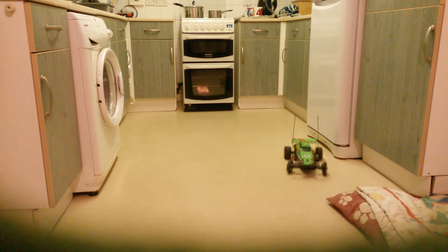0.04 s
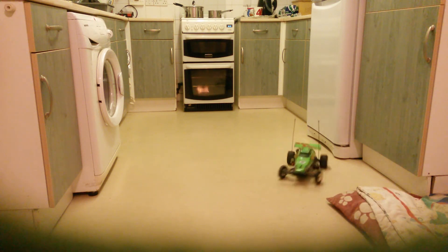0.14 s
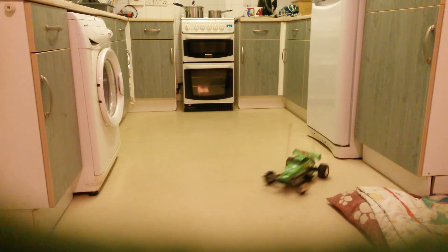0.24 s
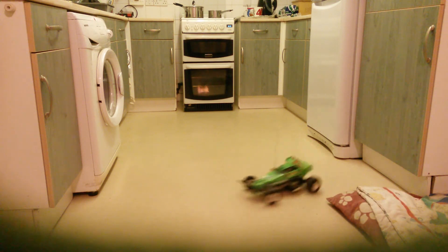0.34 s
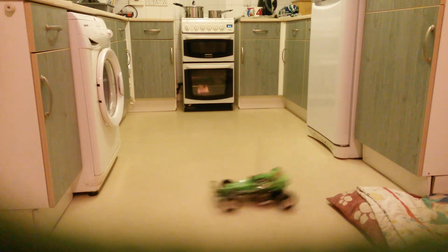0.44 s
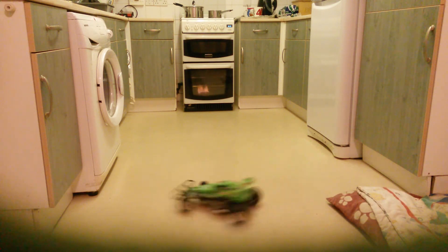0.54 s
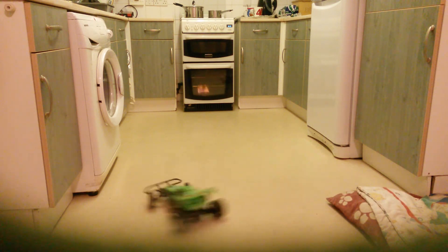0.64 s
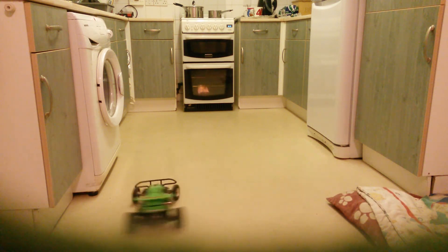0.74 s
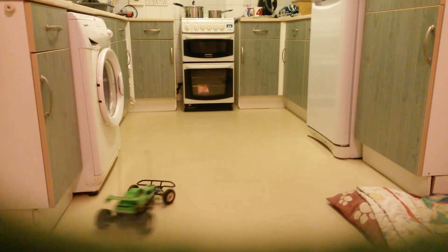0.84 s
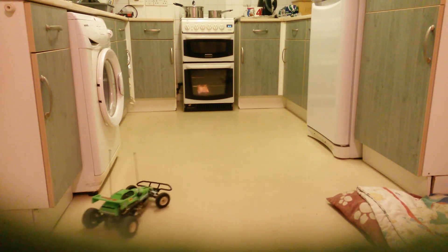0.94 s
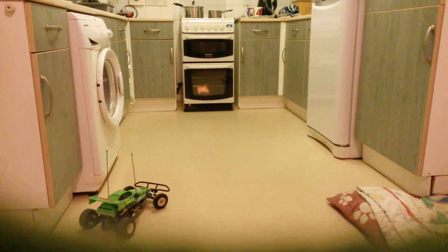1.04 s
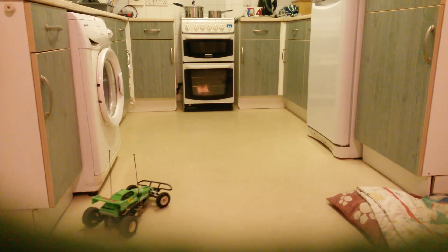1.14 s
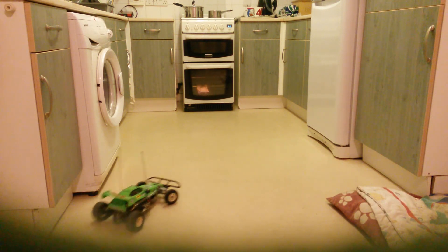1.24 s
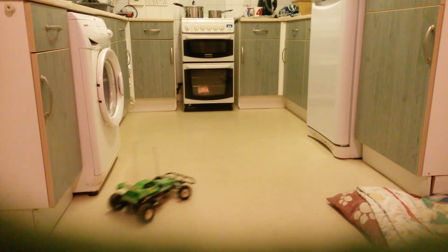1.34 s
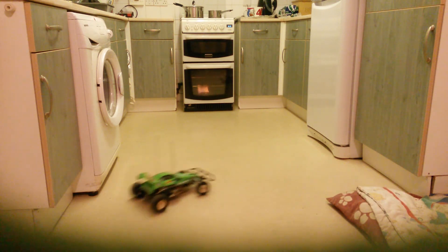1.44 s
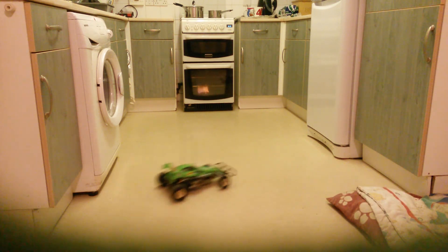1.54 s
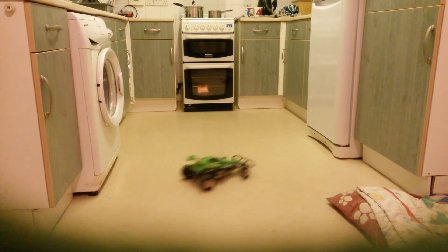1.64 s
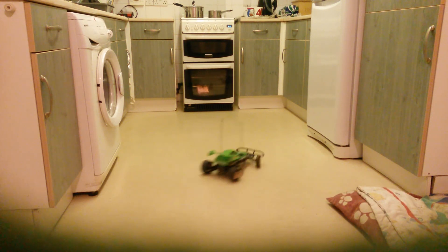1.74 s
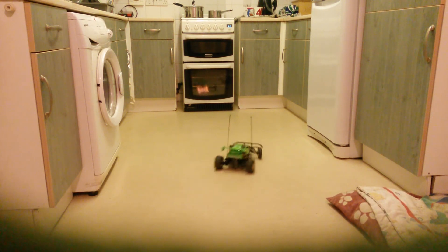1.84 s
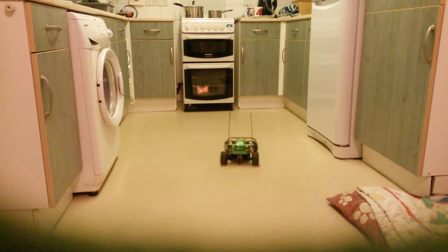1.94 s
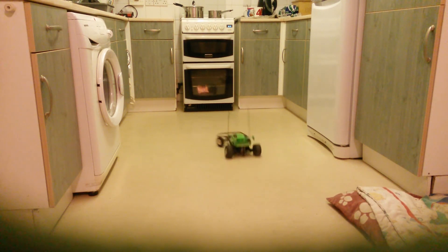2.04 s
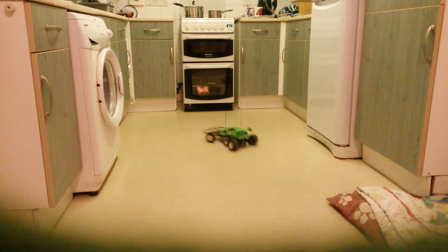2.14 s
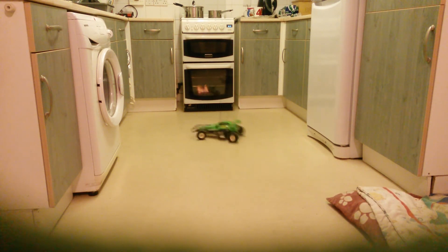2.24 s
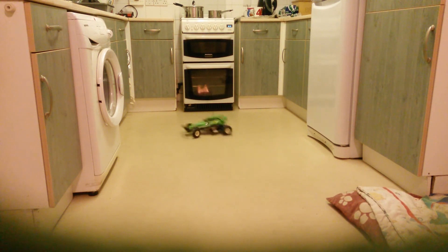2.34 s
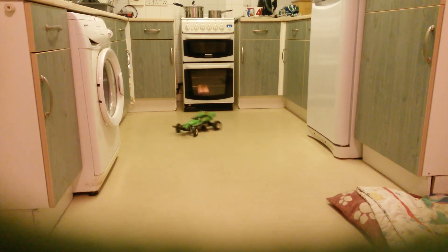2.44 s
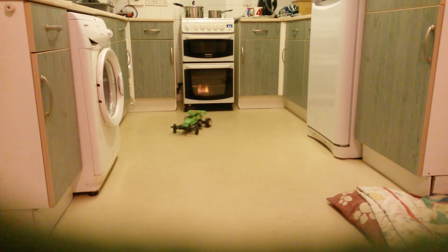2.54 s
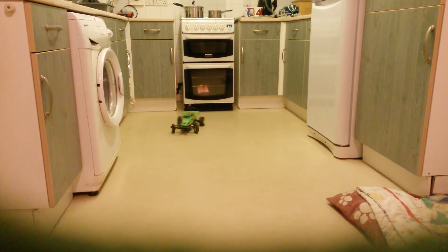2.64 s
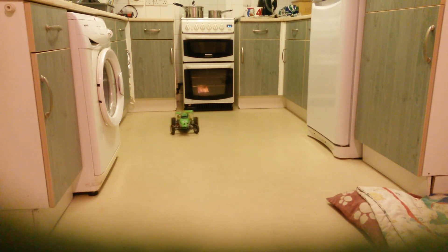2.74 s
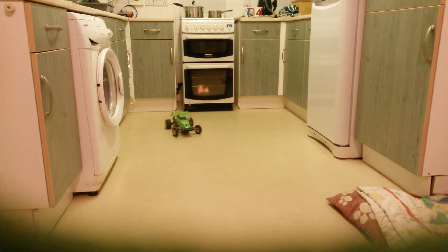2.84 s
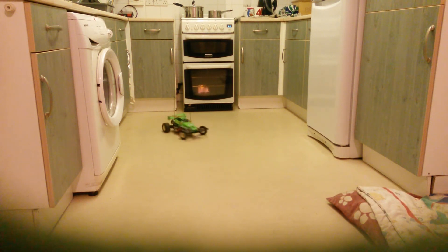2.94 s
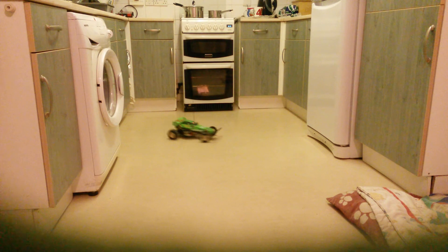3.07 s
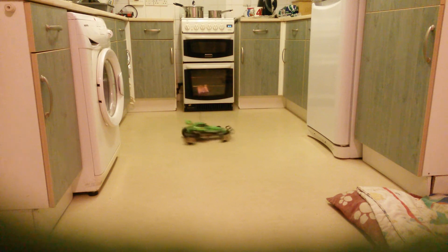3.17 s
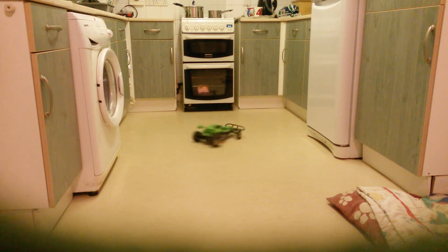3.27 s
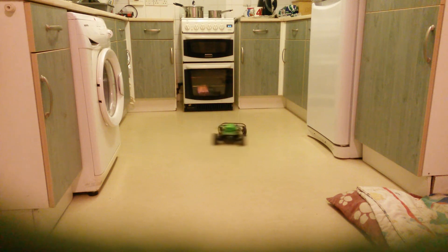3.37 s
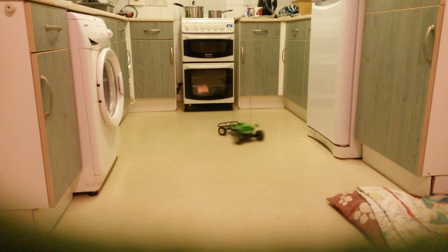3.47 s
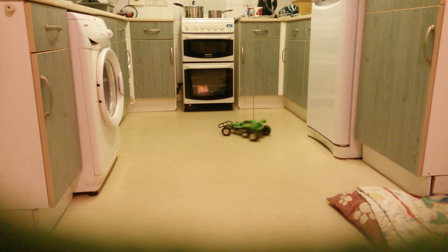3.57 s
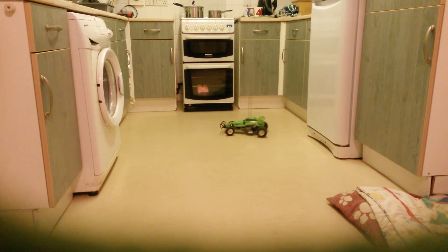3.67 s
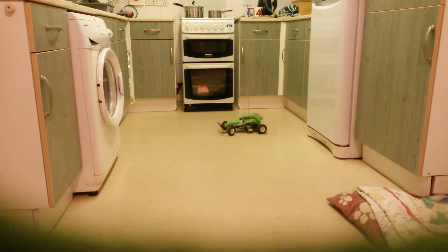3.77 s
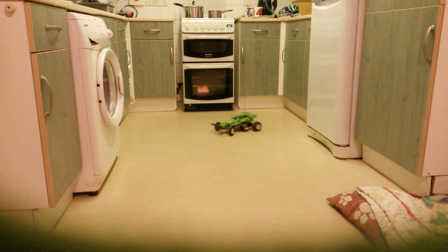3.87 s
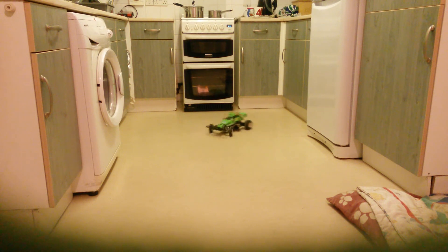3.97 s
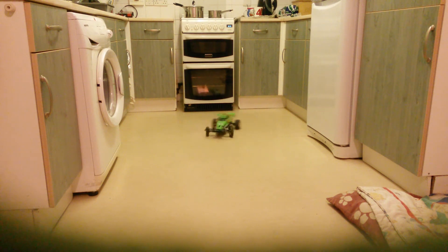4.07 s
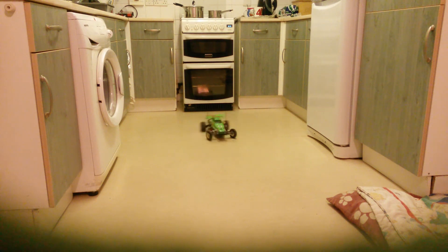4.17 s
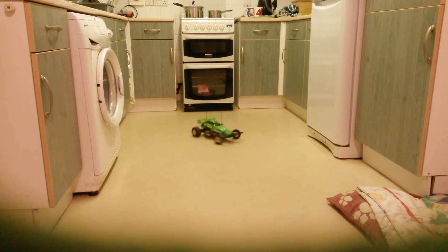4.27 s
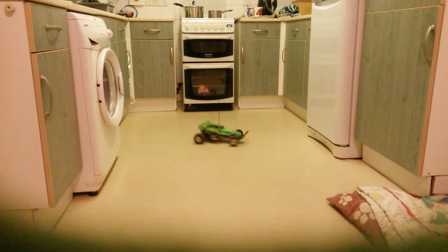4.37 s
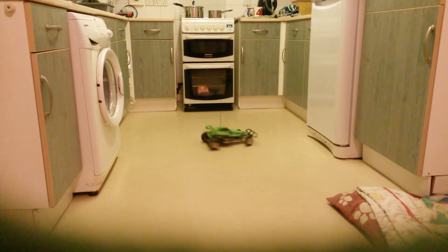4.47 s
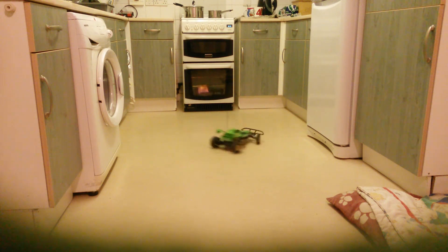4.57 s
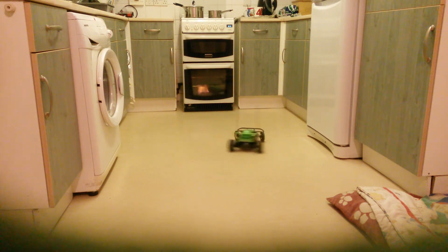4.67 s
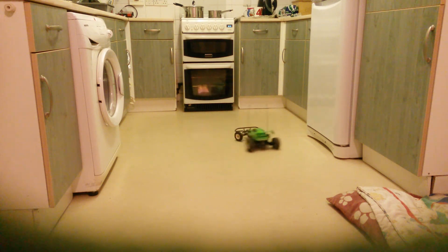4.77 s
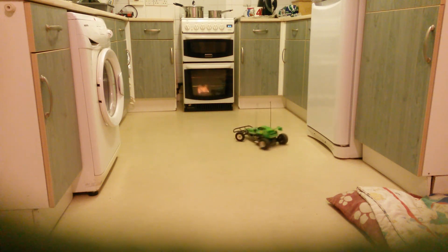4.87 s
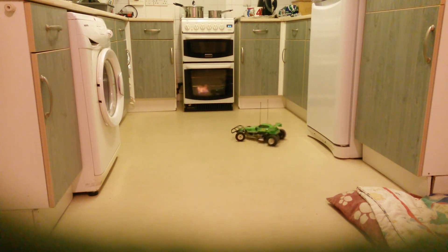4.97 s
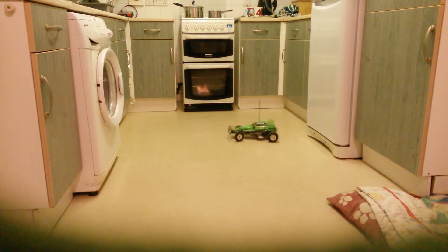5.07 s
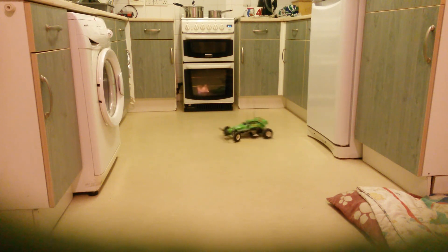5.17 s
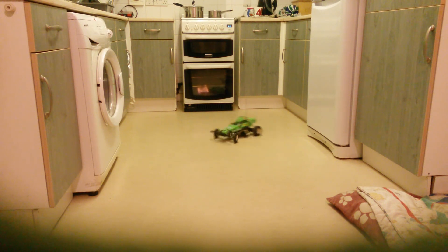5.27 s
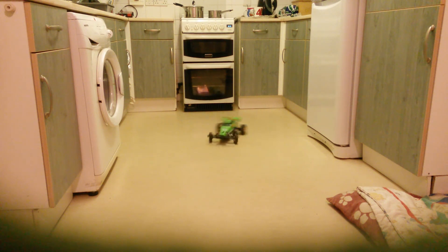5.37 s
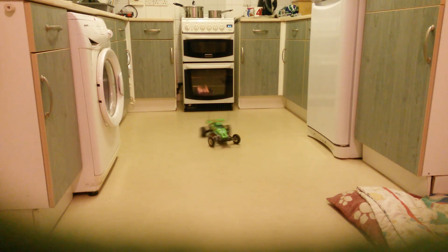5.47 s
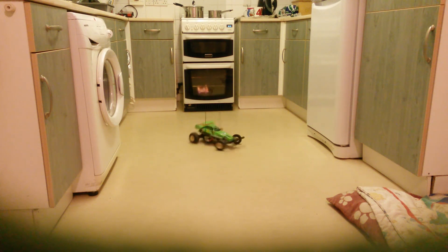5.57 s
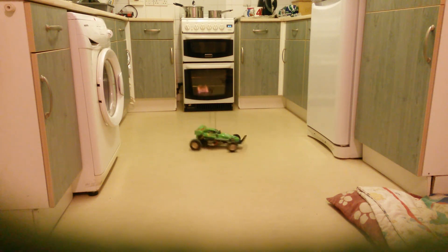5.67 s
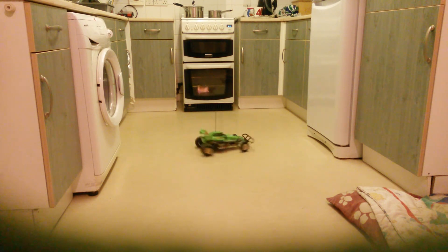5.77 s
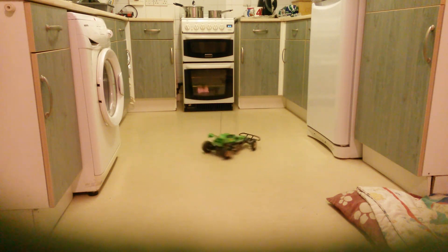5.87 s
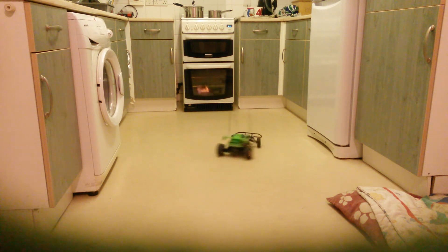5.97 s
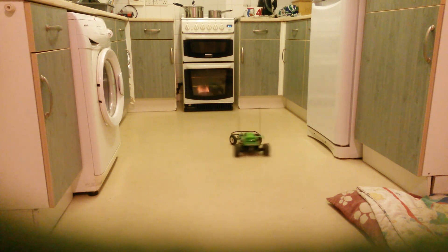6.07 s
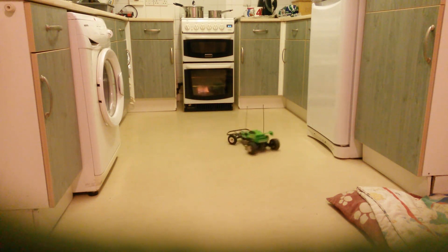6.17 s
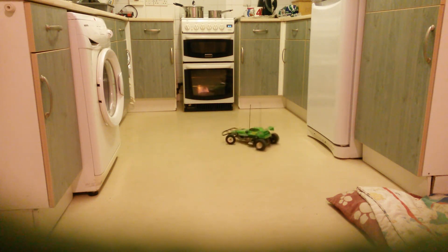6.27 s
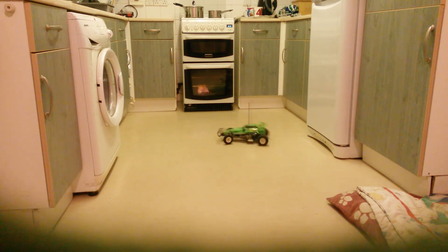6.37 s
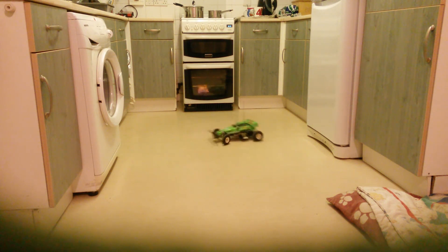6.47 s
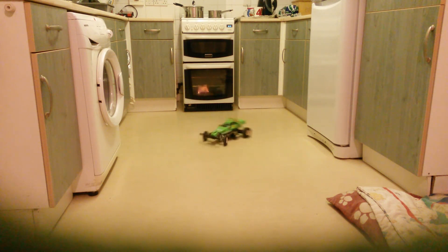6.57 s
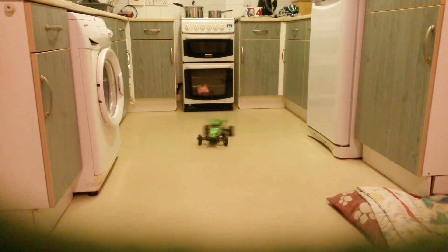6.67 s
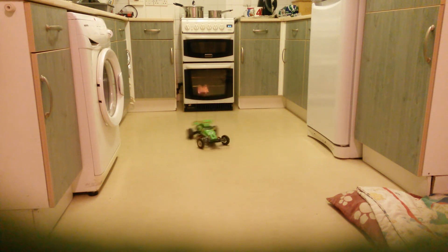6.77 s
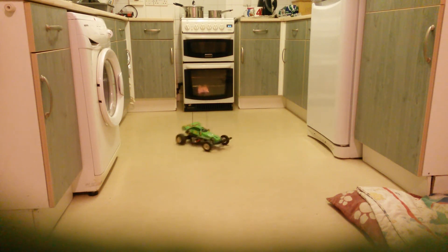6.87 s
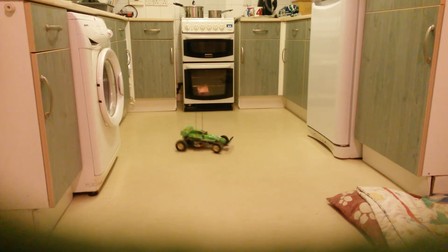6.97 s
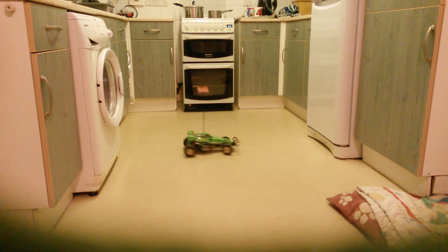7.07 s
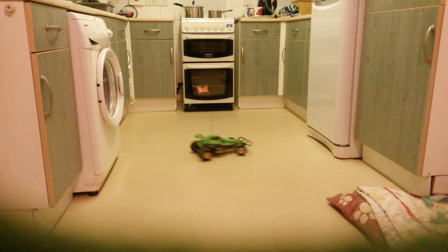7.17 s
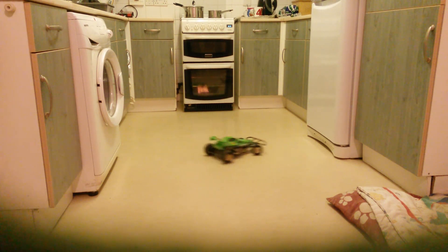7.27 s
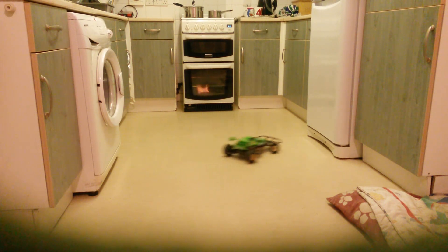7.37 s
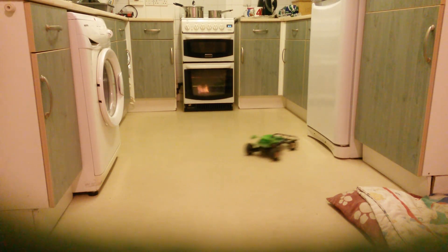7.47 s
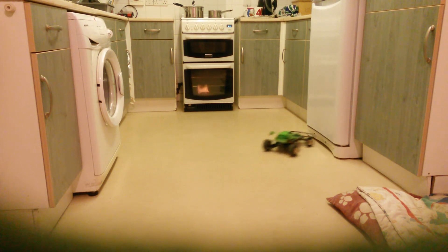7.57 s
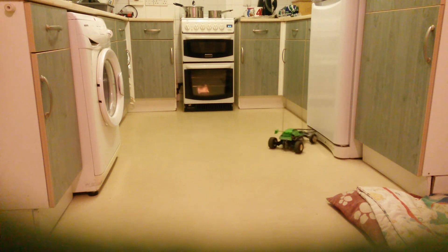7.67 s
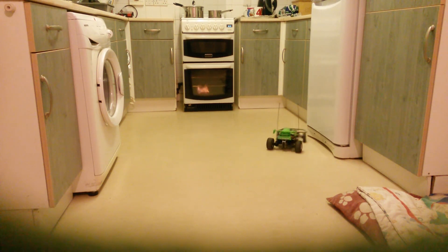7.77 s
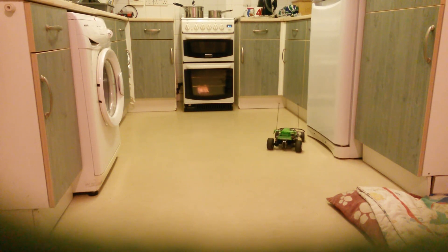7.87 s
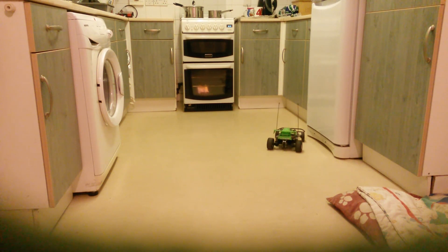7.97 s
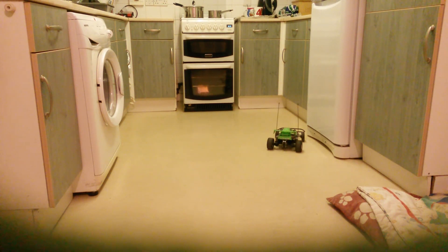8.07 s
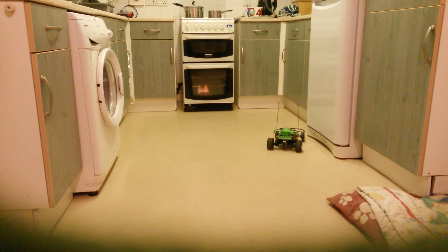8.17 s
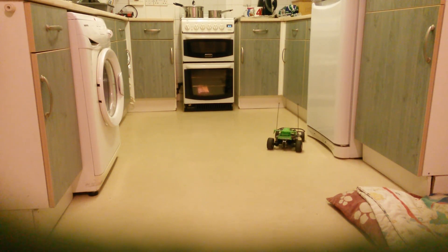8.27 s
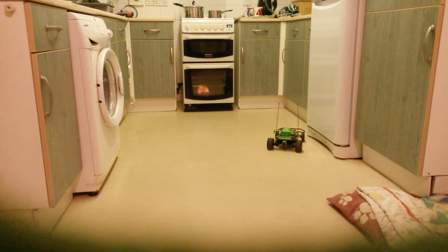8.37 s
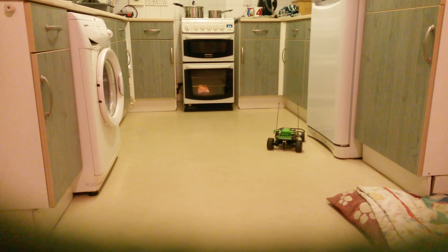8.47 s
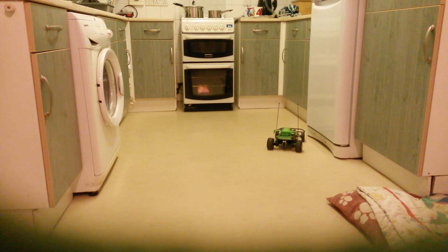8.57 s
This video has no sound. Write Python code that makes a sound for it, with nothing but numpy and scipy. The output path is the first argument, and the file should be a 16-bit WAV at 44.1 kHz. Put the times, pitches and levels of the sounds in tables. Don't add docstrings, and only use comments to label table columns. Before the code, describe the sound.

A small electric toy buggy runs on a hard kitchen floor, heard through a bright little stereo microphone with a treble peak, leaning left. Already running at 0 s, its plastic gears whine around 2 to 3 kHz with gritty tooth clatter and tyre scrub, jumping higher near 0.5 s and coasting down after 0.7 s almost to silence. A second dart climbs from 1.2 to 1.6 s and fades. The shrillest burst starts hard at 1.95 s, peaks near 2.2 s and drops away by 2.6 s. From 2.65 s it weaves, whine wavering, then circles from 3.5 s, dipping near 4 s and then holding a steady rough whirr under a faint 1 kHz motor tone. Sharp ticks at 5.9 s. Power cuts about 7.5 s; at 7.68 s a hollow plastic crash rattles, followed by light rocking knocks at 8.2 and 8.33 s, then faint room hush.

```python
import sys
import numpy as np
from scipy import signal
from scipy.fft import rfft, irfft, next_fast_len
from scipy.io import wavfile
from scipy.ndimage import uniform_filter1d

SR = 44100
rng = np.random.default_rng(int(sys.argv[2]) if len(sys.argv) > 2 else 0)


def elevation(decibels):
    levels = np.asarray(decibels, float)
    return 10 ** (levels / 20)


def output_pcm(signal):
    pcm = np.clip(np.atleast_2d(signal).T, -1, 1) * 32767
    wavfile.write(sys.argv[1], SR, np.round(pcm).astype(np.int16))


N = 380128


def unit(x):
    return x / np.sqrt(np.mean(abs(x) ** 2) + 1e-20)


def along(points, hz):
    f, v = np.transpose(points)
    return np.interp(np.log(hz + 1), np.log(f + 1), v)


def curves(rows):
    s, *cols = np.transpose(rows)
    return [np.interp(np.arange(N) / SR, s, c) for c in cols]


def wobble(rate):
    knots = rng.standard_normal(int(N * rate / SR) + 4)
    return np.interp(np.arange(N) * rate / SR, np.arange(len(knots)), knots)


def filtered(x, response):
    m = next_fast_len(N + SR // 4)
    return irfft(rfft(x, m) * response(np.fft.rfftfreq(m, 1 / SR)), m)[..., :N]


def hiss(spectrum):
    return unit(filtered(rng.standard_normal((2, N)), lambda hz: elevation(along(spectrum, hz))))


def blurred(turns, blur_hz, steady):
    drift = [steady + wobble(blur_hz) + 1j * wobble(blur_hz) for _ in range(2)]
    return np.sqrt(2) * np.real(unit(np.array(drift)) * np.exp(2j * np.pi * turns))


def echoes(pair, direct):
    t = np.arange(SR // 4) / SR
    room_t60 = 0.3
    tail = elevation(-60 * t / room_t60) * rng.standard_normal((2, len(t)))
    tail = tail / np.linalg.norm(tail[0])
    tail[:, 0] = direct
    return signal.fftconvolve(pair, tail / np.linalg.norm(tail[0]), axes=1)[:, :N]


def port(hz):
    top_hz, half_width_hz = 7216, 430
    return 1 / np.sqrt(1 + ((hz - top_hz) / half_width_hz) ** 2)


# time in seconds, tooth rate in Hz, load (whine over chassis) in dB.
DARTS = [
    [(0, 2400, -19), (.07, 2470, -12), (.1, 2570, -5), (.16, 2560, -6), (.2, 2400, -18), (.27, 2050, -16),
     (.34, 2150, -13), (.4, 2160, -7), (.46, 2230, -11), (.49, 2900, -18), (.53, 3030, -7), (.57, 3100, -3),
     (.61, 3120, -10), (.7, 3100, -17)],
    [(1.1, 890, -30), (1.2, 1400, -24), (1.25, 1700, -13), (1.285, 1850, -12), (1.31, 2100, -12),
     (1.35, 2450, -10), (1.45, 2820, -7), (1.52, 2880, -4), (1.6, 2640, -5), (1.66, 2480, -8),
     (1.72, 2400, -20)],
    [(1.96, 2300, -30), (2.0, 2900, -12), (2.04, 3350, -7), (2.075, 3750, -5), (2.11, 3850, -8),
     (2.13, 4250, -16), (2.15, 4350, -14), (2.21, 4420, -15), (2.235, 3500, -20), (2.26, 3250, -12),
     (2.29, 3000, -9), (2.305, 2600, -6), (2.34, 2660, -2), (2.37, 2600, -24), (2.6, 1750, -30)],
    [(2.68, 2150, -14), (2.73, 2600, -5), (2.81, 2720, -4), (2.88, 2600, -18), (3.0, 2650, -8),
     (3.14, 2860, -4), (3.22, 2600, -10), (3.3, 2500, -18), (3.37, 2880, -7), (3.43, 2860, -9),
     (3.46, 2660, -6)],
]
# time in seconds, tooth rate in Hz, load (whine over chassis) in dB.
CIRCLES = [(3.55, 2584, -7), (3.76, 2240, -8), (3.9, 2075, -10.5), (4.05, 2058, -10.5), (4.2, 2350, -8),
           (4.34, 2631, -8), (4.55, 2701, -4.5), (4.66, 2629, -5.5), (4.95, 2578, -6.5), (5.2, 2546, -7.5),
           (5.4, 2602, -7), (5.55, 2580, -3.5), (5.9, 2525, -6), (6.18, 2526, -5.5), (6.4, 2663, -4),
           (6.9, 2665, -6), (7.1, 2757, -6), (7.5, 2602, -6.5), (7.66, 2312, -35), (8, 803, -38)]


def gear_train():
    return curves(np.vstack(DARTS + [CIRCLES]))


# time in seconds, clatter level in dB.
EFFORT = [
    [(0, -25.5), (.05, -22), (.15, -21), (.256, -27.5), (.546, -17), (.694, -24.5), (.814, -36),
     (1.004, -44), (1.11, -54)],
    [(1.15, -53), (1.19, -44.5), (1.25, -22.5), (1.315, -22), (1.34, -20), (1.5, -19), (1.655, -23.5),
     (1.925, -43.5), (1.96, -41.5)],
    [(1.97, -31), (2.0, -19), (2.08, -17), (2.17, -20), (2.265, -19), (2.41, -26), (2.57, -38), (2.62, -43)],
]
# time in seconds, clatter level in dB.
STEADY_EFFORT = [(2.67, -29), (2.73, -21), (2.9, -23.5), (2.98, -21.5), (3.15, -20), (3.28, -24),
                 (3.41, -20.5), (3.66, -22.5), (3.91, -23.5), (4.1, -23.5), (4.24, -21.5), (5.18, -21.5),
                 (5.7, -22.5), (5.9, -21.5), (6.6, -22), (7.5, -20.5), (7.58, -25), (7.67, -35.5)]
# peak time in seconds, peak level in dB, rise and fall in dB per second.
SHAKES = [
    (1.98, -33, 2499, 300),
    (7.675, -21.5, 4001, 90),
    (7.734, -19, 330, 97),
    (7.87, -26, 193.5, 138),
    (8.21, -36.5, 154, 250),
    (8.336, -42.5, 2500, 120),
    (8.3, -51.5, 45, 26),
]
GROWTH = [(-57, -2, -3, -11.5), (-39.5, -3, -1.5, -15.5), (-25.5, -0.5, -5, -16), (-22, -5, -9, -15),
          (-17.5, -7.5, -14, -15.5)]
# tooth rate in Hz, chassis change in dB, drone change in dB,
# dull clatter over the bright in dB.
COAST = [(800, -2.5, -8.5, -11), (1310, -7.5, -15.5, -5), (1905, 0, -6, -6), (2250, -0.5, -1.1, -12)]


def loudness():
    t = np.arange(N) / SR
    s, db = np.vstack(EFFORT + [STEADY_EFFORT]).T
    levels = [np.interp(t, s, db + 0.34, right=-90)]
    for at, peak_db, rise, fall in SHAKES:
        levels.append(peak_db - np.where(t < at, rise * (at - t), fall * (t - at)))
    clatter_db = np.max(levels, axis=0)

    growth_level, *over = np.transpose(GROWTH)
    chassis_db, drone_db, top_db = [np.interp(clatter_db, growth_level, c) for c in over]

    pulled = np.max([1. * (t > on) * (t < off) for on, off, *_ in TRIGGER], axis=0)
    grip_s = 0.064
    free = 1 - uniform_filter1d(pulled, size=int(grip_s * SR) + 1)
    tooth_hz, _ = gear_train()
    coast_hz, *quiet = np.transpose(COAST)
    shell_db, tyre_db, dull_db = [np.interp(tooth_hz, coast_hz, c) for c in quiet]
    return clatter_db, chassis_db + free * shell_db, drone_db + free * tyre_db, top_db, free * elevation(dull_db)


# multiple of the tooth rate, level over the drone in dB, blur
# in Hz.
OTHER_STAGES = [(.258, -9, 69.5), (.5, -9, 59.9), (1.31, -9, 90.07), (1.5, -11.5, 119.6)]
# frequency in Hz, gain in dB.
CASING = [(530, 2.5), (680, -2.5), (1050, -0.5), (1300, 1.5), (2800, -7), (3200, 1), (3700, -4.5)]
# frequency in Hz, level over the whine in dB.
SECOND_HARMONIC = [(4100, 2.5), (4350, -4), (4600, -9), (5100, -8.5), (5350, -6), (5650, -3.5),
                   (7300, 14.5), (8600, 12)]
# time in seconds, trembling share of the speed,
# lagging inner wheel's gear over the whine in dB.
TREMBLE = [(0, .012, -16), (.45, .012, -14), (.51, .016, 6), (.56, .016, -13), (.62, .016, -3),
           (1.2, .018, -12), (2, .028, -1), (2.1, .028, -3), (2.16, .024, -10), (2.6, .02, -14),
           (2.8, .024, -6), (3.0, .026, -6), (3.3, .024, -7), (3.45, .016, -9), (3.6, .008, -20),
           (4.3, .008, -20), (4.55, .012, -16), (4.7, .005, -22), (6.2, .005, -22), (6.4, .016, -15),
           (6.9, .016, -15), (7.1, .028, -12), (7.5, .026, -12)]


def gears():
    tooth_hz, whine_db = gear_train()
    clatter_db, chassis_db, drone_db, *_ = loudness()
    tremble, lagging_db = curves(TREMBLE)
    extra_tremble = tremble - tremble.min()
    turns = np.cumsum(tooth_hz * (1 + tremble * wobble(110))) / SR

    stages_db = drone_db + 0.45 * np.minimum(whine_db + 8, 0) - 95 * extra_tremble
    stages = 0
    for k, db, blur_hz in OTHER_STAGES:
        stages = stages + elevation(db + along(CASING, k * tooth_hz)) * blurred(k * turns, blur_hz, steady=0.24)
    stages = elevation(stages_db) * stages

    load_db = chassis_db + whine_db
    second_db = load_db + along(SECOND_HARMONIC, 2 * tooth_hz) - 300 * extra_tremble
    third_db = 3.5 + 0.6 * whine_db - 220 * tremble
    whine = elevation(load_db + 2 - 120 * tremble) * blurred(turns, blur_hz=105, steady=.45)
    whine = whine + elevation(second_db + 2) * blurred(2 * turns, blur_hz=160, steady=.45)
    third = blurred(3 * turns, blur_hz=450, steady=.45)
    whine = whine + elevation(third_db) * port(3 * tooth_hz) ** 1.1 * third

    whine = whine + elevation(load_db + lagging_db + 1.5) * blurred(0.87 * turns, blur_hz=150, steady=.3)
    whine = whine + elevation(load_db - 9 + 350 * tremble) * blurred(turns, blur_hz=420, steady=.01)

    runout = 1 + .25 * np.cos(2 * np.pi * turns / 16)
    return echoes(elevation(clatter_db) * (runout * whine + stages), direct=2.1)


# frequency in Hz, half width in Hz, lift in dB.
SHELL = [(476.6, 19, 5), (662, 29, 6.5), (816, 10, 8.5), (1282, 100, 3.5), (1746, 20, 7), (2183, 33, 4.5)]


def shell_modes(x):
    return unit(filtered(x, lambda hz: elevation(sum(db / (1 + ((hz - c) / w) ** 2) for c, w, db in SHELL))))


# frequency in Hz, level in dB per Hz.
CLATTER = [(3500, -46), (4800, -14), (5700, -10), (6500, -5), (7200, 2), (7900, -6), (8800, -12.5),
           (9600, -55)]
# frequency in Hz, level in dB per Hz.
TOP_HISS = [(8200, -31.5), (9000, -1), (11500, -7.5), (14500, -17.5)]
# frequency in Hz, level in dB per Hz.
CHASSIS = [(1300, -13.5), (1600, -3.5), (2000, 0.5), (2600, 1), (3400, 1), (4500, -1), (5200, -6),
           (6000, -33)]
# frequency in Hz, level in dB per Hz.
DRONE = [(25, -30), (100, -22), (250, -15.5), (380, -8.5), (500, 0), (650, 3.5), (1000, 5), (1400, 6.5),
         (1700, 0.5), (2200, -50)]


def rattle():
    clatter_db, chassis_db, drone_db, top_db, dull = loudness()
    tooth_hz, _ = gear_train()
    shaft_turns = np.cumsum(tooth_hz) / SR / 16
    beat = 0.5 * np.cos(2 * np.pi * shaft_turns + 3.1 * wobble(30))
    lumps = beat + 0.56 * wobble(250) + 0.42 * wobble(25)

    slack_db = 0.87 * wobble(18)
    teeth = elevation(-2.0 + slack_db) * unit(elevation(lumps) * hiss(CLATTER))
    teeth = teeth + elevation(top_db + 0.36) * unit(elevation(lumps) * hiss(TOP_HISS))
    slow_clatter = [(0.805 * hz, db) for hz, db in CLATTER]
    teeth = teeth + dull * elevation(lumps - 3.5) * hiss(slow_clatter)

    shell_lumps = elevation(1.1 * lumps + 0.81 * wobble(22))
    shell = elevation(chassis_db - 2.5) * unit(shell_lumps * shell_modes(hiss(CHASSIS)))
    drone_lumps = elevation(1.4 * lumps + 1.3 * wobble(20))
    drone = elevation(drone_db - 2.0) * unit(drone_lumps * shell_modes(hiss(DRONE)))
    return elevation(clatter_db) * (teeth + shell + drone)


# seconds when pulled, seconds when released, chopping level in dB, seconds to full.
TRIGGER = [
    (-.1, .7, -42, .05),
    (1.13, 1.21, -47, .07),
    (1.2, 1.85, -50, .02),
    (1.95, 2.14, -50, .05),
    (2.59, 2.625, -41, 0.014),
    (2.63, 5.7, -48, .01),
    (5.6, 7.45, -45, .1),
]
# multiple of the chopping rate, level in dB.
CHOP_OVERTONES = [(2, -8), (3, -9), (4, -8), (5, -14), (6, -5), (7, -8), (8, -3)]
# tooth rate in Hz, level of the overtones in dB.
STALL = [(1250, -5), (1500, -8), (1750, -14), (2400, -16)]


def controller():
    t = np.arange(N) / SR
    pulls = []
    for on, off, db, full in TRIGGER:
        swell_db = np.interp(t, (on, on + full), (-12, 0), left=-90)
        fade_db = 280 * np.maximum(t - off, 0)
        pulls.append(db + swell_db - fade_db)
    tooth_hz, _ = gear_train()
    edge_db = along(STALL, tooth_hz)
    chop_hz = 985
    turns = chop_hz * t
    edges = sum(elevation(db) * blurred(k * turns, blur_hz=40, steady=0.85) for k, db in CHOP_OVERTONES)
    return elevation(np.max(pulls, axis=0)) * (blurred(turns, blur_hz=22, steady=1.1) + elevation(edge_db) * edges)


# start in seconds, level in dB, pitch of the hollow in Hz, seconds to die by 60 dB, level of the crack in
# dB.
BUMPS = [(7.675, -26.5, 800, .43, -25), (7.683, -24, 560, .4, -30), (7.72, -21.5, 615, .55, -30),
         (7.678, -40, 90, .51, -48), (7.69, -37, 233, .64, -48), (8.19, -37, 135, .28, -47),
         (8.212, -42, 310, .18, -36), (8.33, -62, 420, .18, -39), (8.462, -42, 128, .13, -51.5),
         (7.676, -27, 2000, .42, -60), (7.68, -21, 2800, .2, -60), (6.89, -37, 91, .2, -70),
         (8.3, -41, 111, .2, -57), (8.55, -56, 110, .15, -70), (8.2, -50, 47, .3, -70),
         (.69, -43, 140, .18, -70), (1.84, -47, 107, .15, -70), (1.98, -42, 180, .2, -60),
         (.65, -45, 230, .2, -70), (1.65, -45, 200, .3, -70), (3.89, -43, 170, .2, -70),
         (4.81, -44, 170, .17, -70), (6.6, -42, 170, .3, -70), (7.44, -42, 100, .17, -70),
         (7.35, -43, 170, .2, -70), (1.27, -30, 540, .3, -70), (1.4, -44, 240, .2, -70),
         (1.53, -44, 190, .2, -70), (2.16, -43, 260, .25, -70), (2.29, -42, 240, .25, -70),
         (3.41, -43, 280, .15, -70), (.28, -44, 270, .2, -70), (.44, -43, 260, .15, -70),
         (2.77, -44, 240, .15, -70), (7.16, -43, 240, .17, -70), (6.99, -44, 240, .15, -70),
         (7.53, -43, 230, .15, -70), (7.78, -31, 700, .5, -70), (0, -29, 680, .4, -70),
         (4.94, -45, 230, .15, -70)]


def bumps():
    out, t = np.zeros((2, N + SR)), np.arange(SR // 2) / SR
    hz = np.fft.rfftfreq(len(t), 1 / SR)
    for s, db, hollow_hz, t60, crack_db in BUMPS:
        white = rng.standard_normal((2, 2, len(t)))
        width = np.interp(hollow_hz, (100, 600), (.25, .7))
        band = 1 / (1 + (np.log(hz / hollow_hz + 1e-6) / width) ** 4)
        body = unit(irfft(rfft(white[0]) * band, len(t)))
        low_tone = np.interp(hollow_hz, (200, 400), (1.4, 0))
        body = body + low_tone * np.sin(2 * np.pi * hollow_hz * t)
        swell = 1 - np.exp(-t * hollow_hz / 2)
        body = elevation(db - 60 * t / t60) * swell * body
        crack = elevation(crack_db - 19 - 60 * t / 0.26) * white[1]
        out[:, round(s * SR):][:, :len(t)] += body + crack
    return out[:, :N]


# frequency in Hz, level in dB per Hz.
KITCHEN = [(20, -10), (60, -9), (130, -6), (300, -5), (450, -16), (1250, -35.5), (4000, -26.5),
           (7200, -14.5), (10000, -27.5), (14500, -23)]


def still_room():
    return elevation(-60.5 + 3.5) * hiss(KITCHEN)


# start in seconds, level in dB, seconds to die by 60 dB.
TICKS = [
    (7.674, -18, .03),
    (7.682, -11, .03),
    (7.696, -18, .02),
    (8.174, -36, .03),
    (8.211, -30, .03),
    (8.221, -32, .03),
    (8.331, -29, .025),
    (8.343, -36, .03),
    (5.888, -14, .04),
    (5.906, -18, .03),
]
# frequency in Hz, level in dB per Hz.
TICK_COLOUR = [(300, -4), (1000, -4), (7200, -1), (9500, -10), (12000, -10), (14500, -14)]


def ticks():
    out, t = np.zeros((2, N + SR)), np.arange(SR // 10) / SR
    for s, db, t60 in TICKS:
        click = elevation(db - 6 - 60 * t / t60) * rng.standard_normal((2, len(t)))
        out[:, round(s * SR):][:, :len(t)] += click
    return filtered(out[:, :N], lambda hz: elevation(along(TICK_COLOUR, hz)))


# frequency in Hz, left-right likeness from -1 to 1.
ALIKE = [(60, 0.54), (250, 0.81), (620, 0.69), (900, 0.52), (1150, 0.3), (1400, -0.36), (2900, 0.17),
         (6000, -0.04)]


def at_ports(pair):
    def blend(hz):
        angle = np.arccos(np.clip(along(ALIKE, hz), -1, 1)) / 2
        return np.array([np.cos(angle), np.sin(angle)])
    mid, side = filtered(pair, blend)
    return np.array([mid + side, mid - side])


def scene():
    return at_ports(gears() + rattle() + controller() + bumps() + still_room() + ticks())


# frequency in Hz, level over the moment's average in dB.
MASK = [(25, 3), (120, 1), (200, -3.5), (350, -7), (480, -12), (700, -22), (1400, -16), (2000, -14),
        (5000, -15), (8300, -11), (9600, -11.5), (11000, -11), (12100, -11), (12500, -6), (14500, -8)]


def masked(x):
    hz, _, z = signal.stft(x, SR, nperseg=2048)
    power, bass = abs(z) ** 2, hz[:, None] < 600
    local = np.where(bass, uniform_filter1d(power, size=2, axis=1), power)

    chance = rng.standard_normal(z.shape[1:])
    grouped = chance[np.arange(len(hz)) // 12 * 12]
    scatter_db = np.where(bass, 2.5 * chance, 3 * grouped)

    moment = power.mean(axis=1, keepdims=True)
    quietness = np.minimum(moment / np.median(moment, axis=2, keepdims=True), 1)
    moment = moment * quietness ** 0.3
    keep = local > moment * elevation(2 * along(MASK, hz)[:, None] + scatter_db)
    gain = np.maximum(keep, elevation(-37) * bass)
    return signal.istft(z * gain, SR, nperseg=2048)[1][:, :N]


def roll_off(x):
    return signal.sosfilt(signal.butter(12, 14520, fs=SR, output="sos"), x)


# frequency in Hz, left over right in dB.
LEFT = [(60, 5.5), (110, -1.5), (200, 7.5), (370, 4), (680, 6), (1240, 4), (2270, 0.5), (4150, 7.5),
        (7600, 5.5), (13900, 3.5)]


def record(dry):
    x = filtered(dry, lambda hz: elevation(np.array([[.5], [-.5]]) * along(LEFT, hz) + 3.0))
    x = x / (1 + abs(x / .9) ** 6) ** (1 / 6)
    return roll_off(masked(x))


dry = scene()
out = record(dry)
output_pcm(out)
```